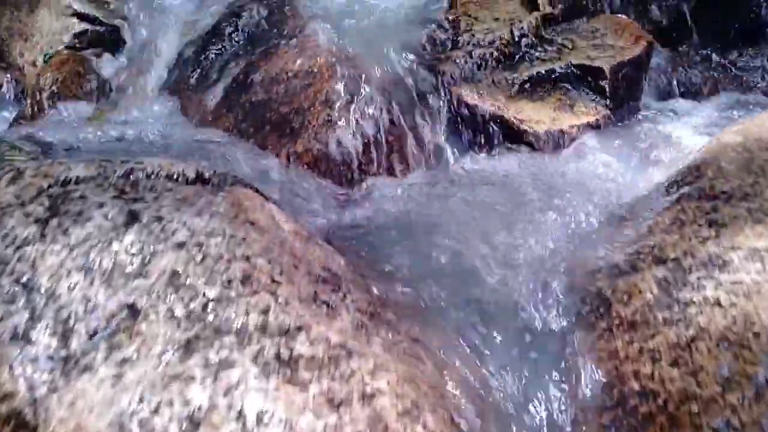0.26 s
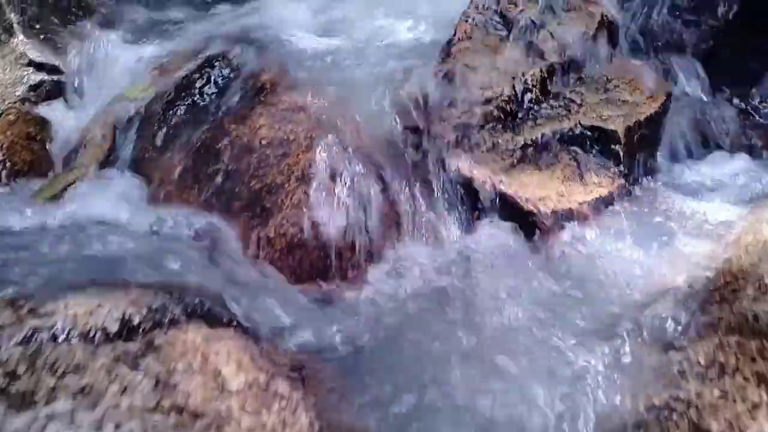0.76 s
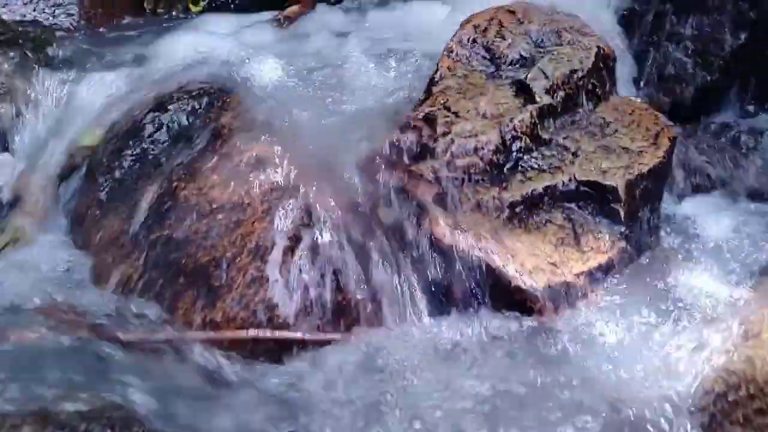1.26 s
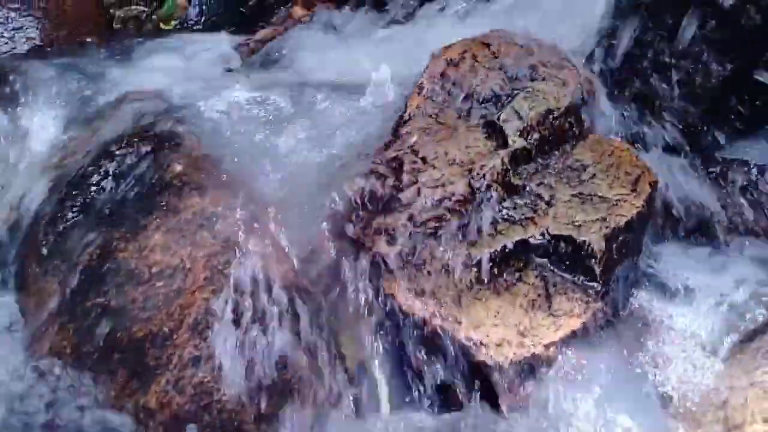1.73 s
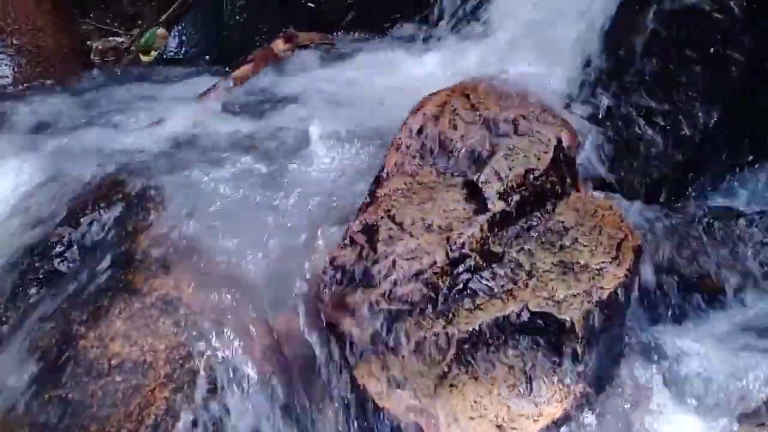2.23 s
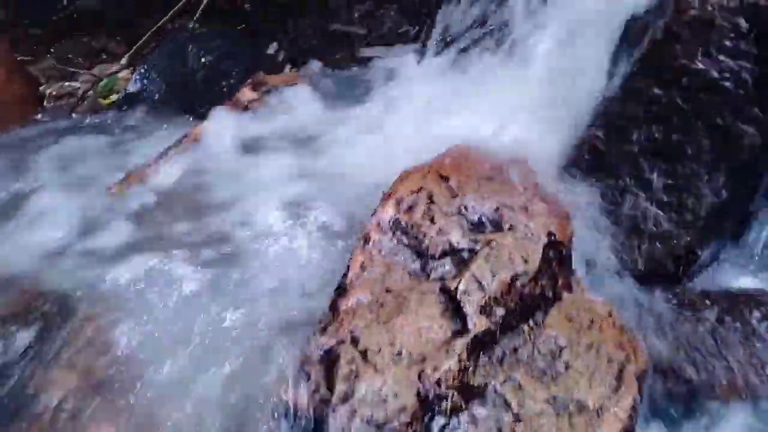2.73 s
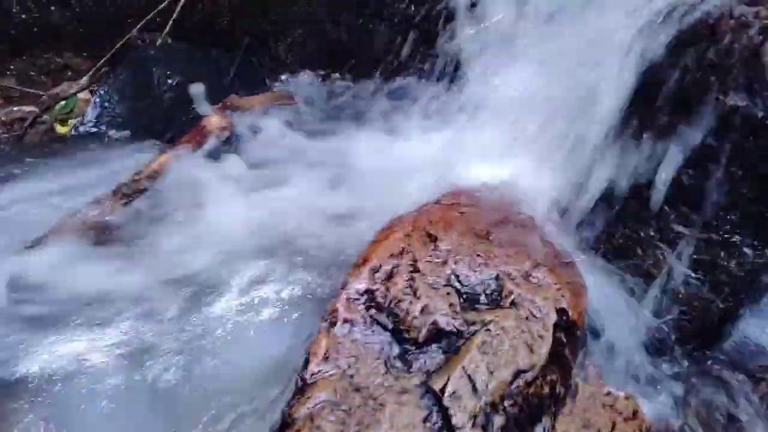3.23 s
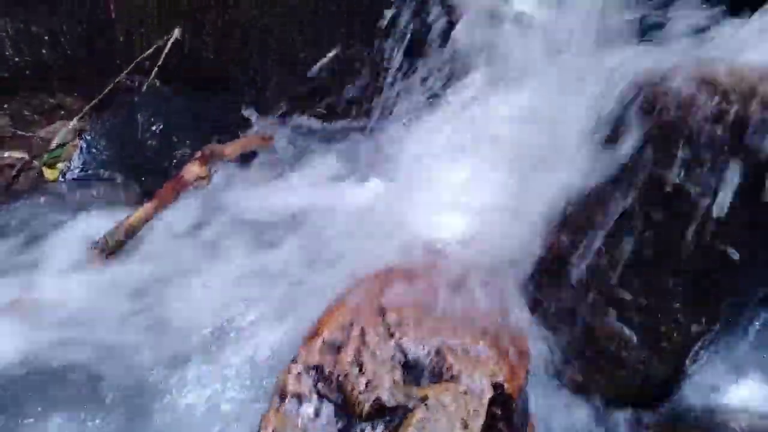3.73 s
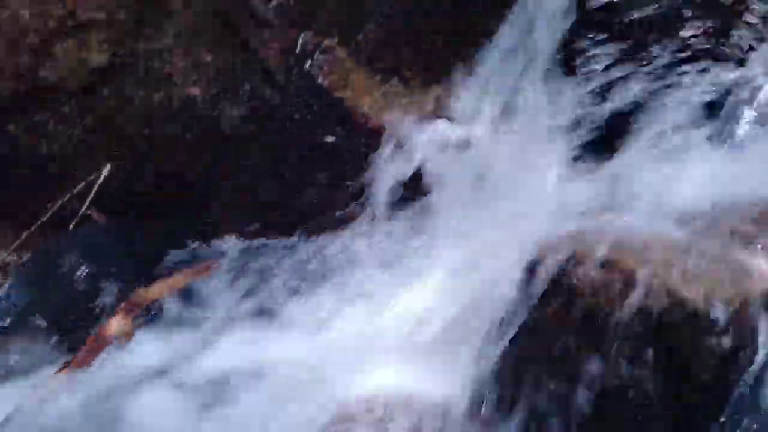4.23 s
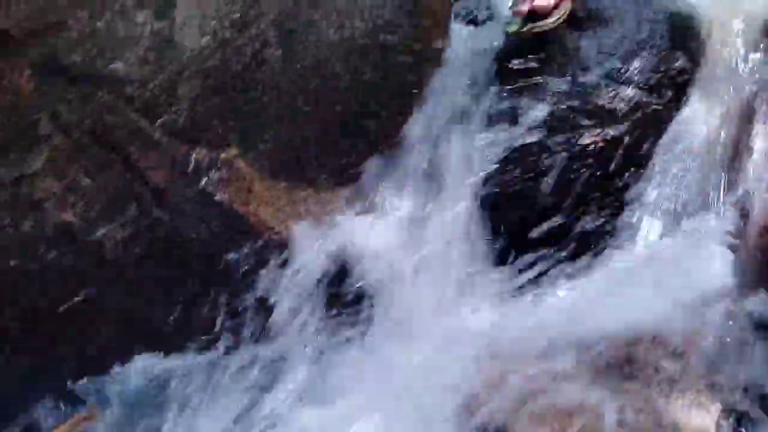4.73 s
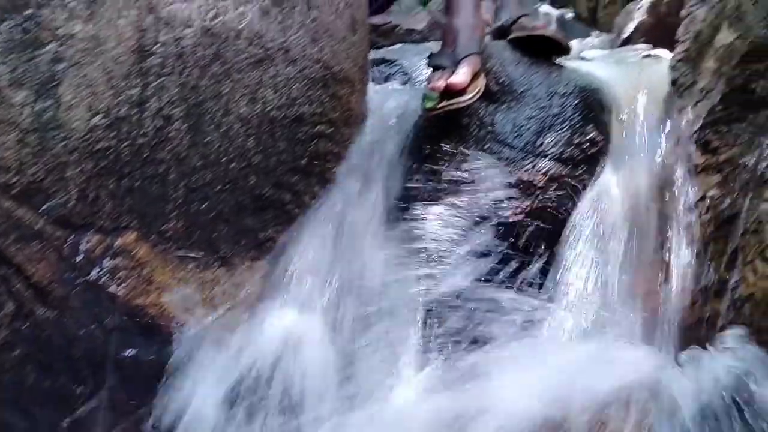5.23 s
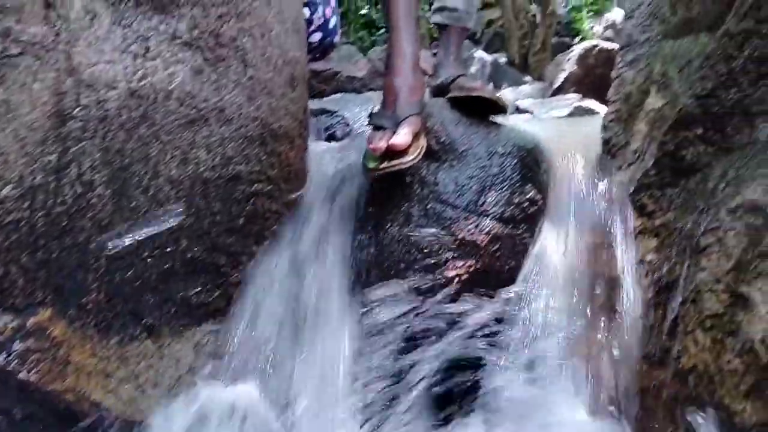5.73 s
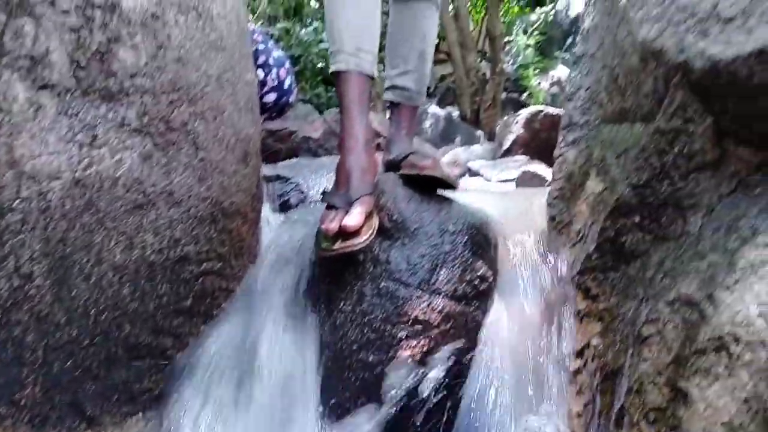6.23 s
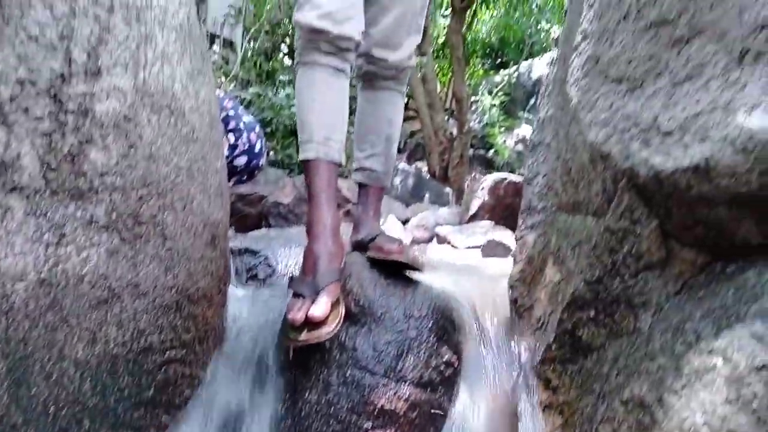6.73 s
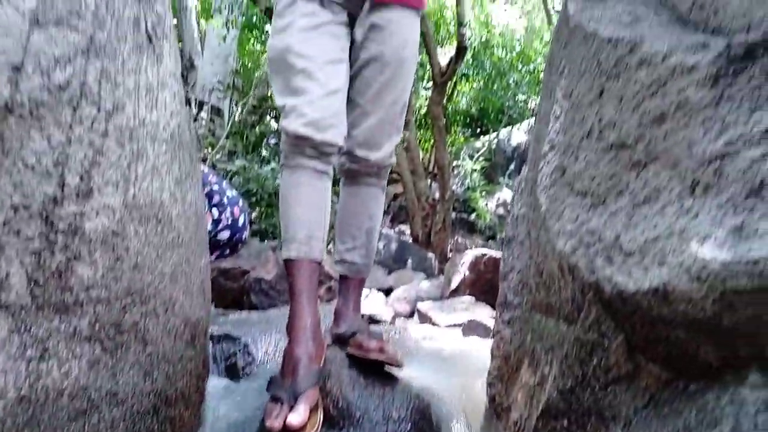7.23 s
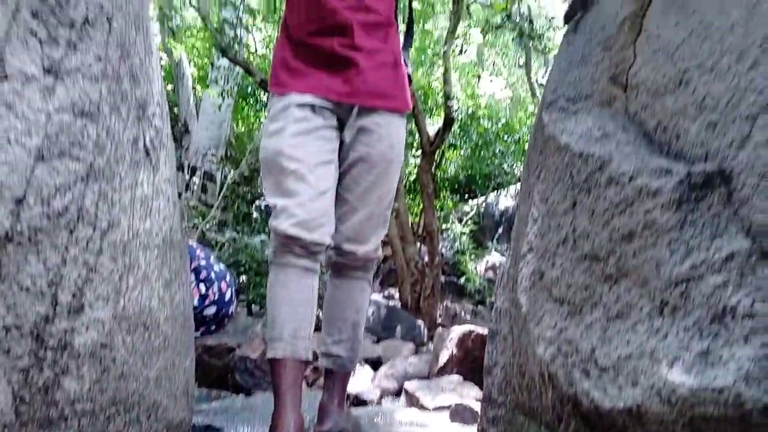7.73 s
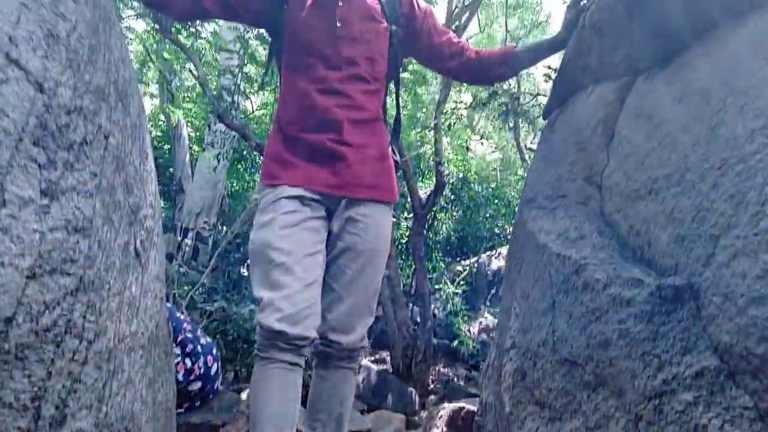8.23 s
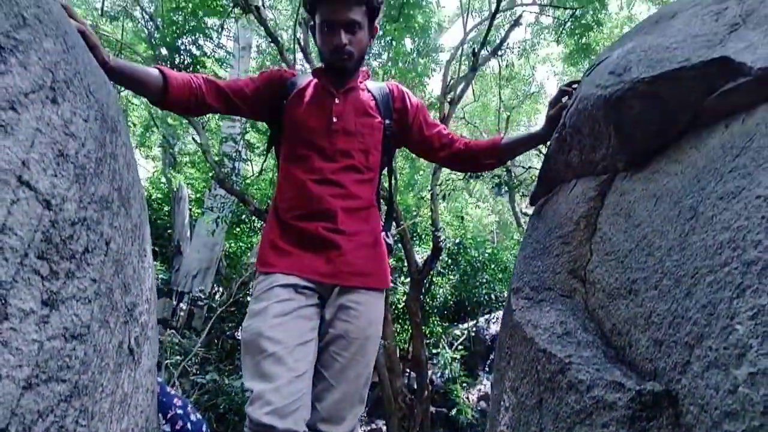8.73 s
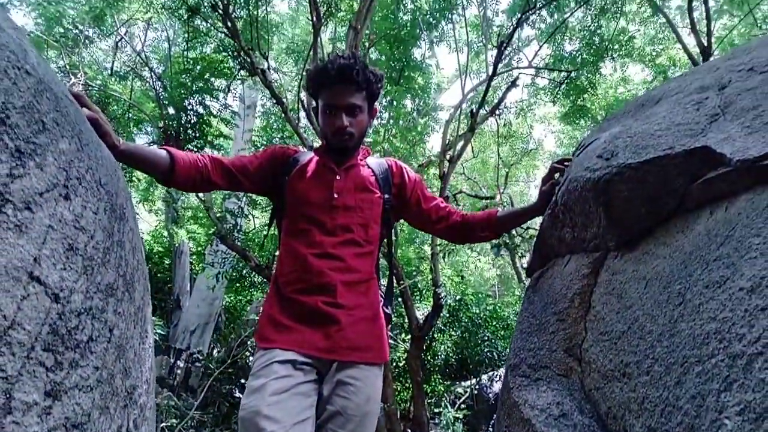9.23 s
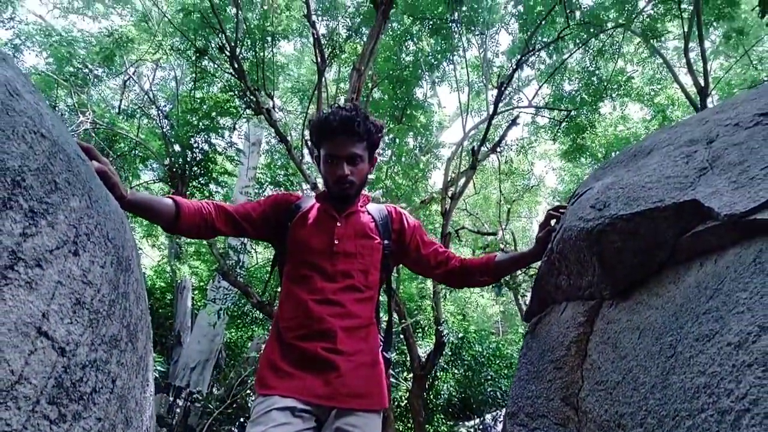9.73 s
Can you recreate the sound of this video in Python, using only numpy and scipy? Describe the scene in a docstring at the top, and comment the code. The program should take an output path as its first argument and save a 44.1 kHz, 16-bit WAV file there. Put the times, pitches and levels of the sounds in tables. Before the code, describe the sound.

A small stream cascades between boulders, heard close through a dull microphone with little treble and little deep bass. From 0 s a steady but patchy low-mid rush flickers and surges, filled with dense tiny ringing bubbles and a thin, faint spray hiss. Over it come many short irregular plops and glugs, each a rounded tone climbing slightly in pitch inside a ragged splash. A strong plop jumps out near 1.3 s, a cluster of gulps around 1.9 s, another heavy splash at 3.8 s, and after a busy steady stretch deeper, louder gulps at about 6.5 to 6.9 s. At roughly 7.7 s one loud, hollow, very short knock overloads with a hard click. Immediately afterwards the water falls to a much lower level, with softer, sparser plops and subdued bubbling, rising slightly around 9 s and continuing to the end near 10 s.

```python
"""Between boulders, close to a dull microphone, a small stream tumbles.
Many plops sound as short tones of climbing pitch, each in a ragged wash of filtered noise.
Around them lie a patchy rush of noise bands, a carpet of small ringing bubbles and a fine hiss of spray.
One loud hollow knock overloads the recorder with a click; the recorded level drops after it and stays lower."""
import sys
import numpy as np
from scipy import signal
from scipy.io import wavfile
from scipy.ndimage import uniform_filter1d, minimum_filter1d

SR = 44100
rng = np.random.default_rng(int(sys.argv[2]) if len(sys.argv) > 2 else 0)


def store_wav(level_fs):
    """Save 16-bit WAV to argv[1]."""
    pcm = np.round(np.clip(np.atleast_2d(level_fs), -1, 1) * 32767)
    wavfile.write(sys.argv[1], SR, pcm.T.astype(np.int16))


N = 439236   # samples, just under 10 s

# Single plops and high droplets, with some extra tones around the knock; levels stand ahead of the limiter.
# Each row: centre in seconds, pitch in Hz, peak in dB, length at half height in ms.
SINGLE_PLOPS = [(0.008, 896, -13, 13), (0.086, 1533, -16.5, 11.6), (0.099, 512, -14, 7.9),
                (0.117, 2395, -33, 5), (0.224, 916, -23.5, 23), (0.353, 1190, -20, 21),
                (0.497, 1360, -23, 7.7), (0.589, 915, -13.5, 17), (0.596, 506, -18.5, 14.5),
                (0.703, 1220, -22, 11), (0.799, 428, -15, 7.2), (0.85, 964, -17.5, 11),
                (0.921, 890, -14.5, 7.4), (0.966, 845, -20, 8.3), (0.971, 1410, -17, 10),
                (1.028, 1255, -19.5, 11), (1.176, 316, -20, 34), (1.263, 606, 3, 5.2),
                (1.314, 1954, -29, 8.4), (1.32, 657, -14.5, 9.5), (1.363, 814, -13.5, 6.1),
                (1.459, 329, -6, 4.2), (1.46, 1464, -20.5, 11), (1.468, 807, -19, 31),
                (1.529, 506, -19, 18), (1.681, 870, -20, 10), (1.831, 2990, -32.5, 15),
                (1.876, 380, -10, 4.4), (1.88, 1290, -17.5, 5.4), (1.899, 1150, -17.5, 10),
                (1.945, 230, -17, 19), (1.948, 662, -5, 12), (1.953, 764, -8.5, 11.5),
                (2.044, 980, -17, 12), (2.089, 329, -17.5, 6.6), (2.183, 436, -17, 5.1),
                (2.214, 273, -16.5, 14), (2.221, 807, -11, 18), (2.546, 810, -20.5, 14),
                (2.613, 495, -19, 33), (2.843, 642, -14, 6.5), (2.854, 985, -21, 17),
                (3.195, 920, -14, 4.6), (3.236, 818, -16.5, 27), (3.349, 930, -15, 6.1),
                (3.502, 162, -25, 12), (3.503, 452, -9, 6.4), (3.51, 296, -19.5, 7.9),
                (3.547, 1015, -13, 3.7), (3.631, 408, -16, 12), (3.79, 922, -14.5, 12),
                (3.797, 402, -1, 6.8), (3.805, 1370, -11.5, 7.8), (3.818, 760, -10.5, 7.9),
                (3.856, 524, -17.5, 17), (3.934, 357, -9.5, 3.9), (3.941, 233, -19, 22),
                (4.026, 588, -11, 12), (4.04, 515, -11.5, 10), (4.058, 710, -19, 12),
                (4.257, 3177, -36.5, 8), (4.288, 875, -21.5, 8), (4.468, 150, -29, 10),
                (4.494, 292, -22, 9.2), (4.621, 906, -12.5, 16.4), (4.848, 879, -7.5, 12.3),
                (4.927, 816, -21, 12), (4.956, 480, -21.5, 13), (5.092, 342, -9.5, 9.6),
                (5.125, 2770, -34, 14), (5.227, 475, -17.5, 17), (5.307, 1010, -19, 24),
                (5.368, 706, -16.5, 8.3), (5.418, 895, -14, 13), (5.438, 390, -17.5, 19),
                (5.562, 960, -14, 19), (5.625, 2400, -32, 3.6), (5.718, 1290, -14.5, 5.5),
                (5.752, 910, -17.5, 11), (5.882, 513, -19.5, 9.7), (5.91, 580, -17, 10),
                (6.178, 1096, -22, 14), (6.193, 420, -19.5, 7.9), (6.209, 758, -18, 14),
                (6.245, 254, -13.5, 13), (6.281, 490, -18, 16), (6.454, 994, -9.5, 4.6),
                (6.484, 560, -4, 5), (6.491, 404, -12.5, 19), (6.615, 408, -13, 8),
                (6.687, 309, -4.5, 12.6), (6.693, 548, -3.5, 9.4), (6.696, 130, -20.5, 10.4),
                (6.781, 650, -10, 13), (6.805, 1490, -18, 6), (6.82, 824, -6.5, 14),
                (6.861, 1840, -24.5, 6.5), (6.874, 155, -26, 23), (6.876, 324, -11.5, 6.4),
                (6.912, 514, -14.5, 4.8), (6.918, 227, -16, 4.6), (7.076, 584, -12.5, 11),
                (7.253, 286, -22.5, 17), (7.3, 420, -20, 14), (7.435, 490, -11, 29), (7.659, 596, -17, 3.2),
                (7.662, 310, -19, 8.5), (7.666, 760, -11.5, 4.4), (7.668, 2806, -36, 17),
                (7.687, 980, -19, 7), (7.78, 397, -19.5, 8.1), (7.82, 417, -22, 11),
                (7.935, 532, -27.5, 11.4), (8.069, 487, -24, 9.9), (8.089, 1330, -17.5, 3.1),
                (8.1, 1264, -12, 6.4), (8.277, 1326, -27.5, 13), (8.388, 748, -24, 23),
                (8.448, 297, -31.5, 25), (8.496, 622, -22.5, 11.4), (8.677, 608, -19.5, 10),
                (8.76, 380, -20.5, 18), (8.842, 1170, -25, 6.5), (8.881, 970, -22, 10),
                (8.889, 573, -25, 9.1), (9.08, 440, -24.5, 14.5), (9.326, 890, -24, 12),
                (9.388, 273, -27, 22), (9.481, 1054, -16, 16.3), (9.579, 970, -20.5, 10),
                (9.58, 324, -16, 5.8), (9.778, 484, -21, 15)]
# The smaller plops: how far they peak above the rush reference, by pitch.
# Each row: pitch in Hz, peak above the reference in dB.
SMALL_PLOP_PEAKS = [(180, -3.5), (400, 3.5), (900, 4), (1400, -0.1), (2000, -12), (3300, -13)]
# The one hollow knock, flat at the top for two thirds of its length.
# The row: centre in seconds, pitch in Hz, peak in dB, length in ms.
KNOCK_EVENT = (7.6706, 1046, -3.5, 8.5)
# Level of rush and spray as recorded, trimmed in scene(); the drop after the knock is included.
# Each row: time in seconds, rush reference in dB, spray hiss reference in dB.
RECORDED_LEVELS = [(0.0, -24.5, -49), (0.4, -26.5, -51.5), (1.0, -25.5, -48), (1.7, -24, -49),
                   (2.2, -23.5, -48.5), (3.3, -26.5, -52.5), (3.85, -22, -49.5), (4.1, -25, -51),
                   (4.75, -25.5, -50), (5.3, -25.5, -48), (6.2, -26, -51), (6.85, -22, -46),
                   (7.62, -26.5, -50), (7.71, -34.5, -61.5), (8.5, -35, -58), (9.0, -31.5, -56.5),
                   (9.3, -33.5, -59.5), (9.96, -32.5, -54.5)]
# The colour of the rush. Each row: frequency in Hz, relative level in dB per Hz.
RUSH_SPECTRUM = [(15, -53.5), (25, -34.5), (42, -18), (114, -17), (238, -5.5), (374, -6), (478, -0.5),
                 (928, 1.5), (1460, -5), (1940, -34), (2300, -25), (2990, -56.5), (5060, -120)]
# The mix of small bubble sizes. Each row: ringing pitch in Hz, relative level in dB.
BUBBLE_SIZES = [(120, -32.5), (250, -4.5), (500, 2.5), (1000, 6.5), (1500, -1), (2200, -30.5)]

SMALL_COUNT, SMALL_SPREAD_DB = 85, 2   # number of small plops; level scatter, plus or minus
SMALL_SHORT_MS, SMALL_LONG_MS = 4.5, 19.0
LOW_CUT_HZ, LIMIT_TOP = 56, .66        # LIMIT_TOP and OVERLOAD are amplitudes, full scale = 1
MIC_EDGE_HZ, OVERLOAD = 3181, .7
FAINT_HISS_DB, CUTOFF_HZ = -86.5, 15800


def plops(rows, rise_hz, lean, deep_hz, wash_db, wash_length, wash_width):
    """Each plop swells, rings and fades while its pitch climbs, inside a longer ragged wash of nearby pitch.
    Returns the sound, its outline and the outline of the deep ones."""
    sound, outline, deep = np.zeros((3, N))
    white = rng.standard_normal(N)
    start_turns = rng.random(len(rows))   # starting phase, in turns
    for (centre_s, hz, peak_db, ms), turn in zip(rows, start_turns):
        half_s = max(ms, 1) / 2000
        first = max(int((centre_s - 8 * half_s) * SR), 0)
        last = min(int((centre_s + 12 * half_s) * SR), N)
        at = np.arange(first, last)
        u = (at / SR - centre_s) / half_s   # time in half-lengths from the centre

        # the swell is steeper than the fade
        fall_db = 6 * u ** 2 * np.where(u < 0, lean, 1 / lean)
        shape = from_db(peak_db - fall_db)
        climb = rise_hz * np.sqrt(hz / 1000) * u ** 2   # higher plops climb more
        turns = half_s * (hz * u + climb) + turn
        sound[at] += shape * np.sin(2 * np.pi * turns)

        # the air pocket breaks into smaller bubbles
        wash = rms_one(resonance(white[at], hz, wash_width * hz))
        sound[at] += from_db(peak_db + wash_db - fall_db / wash_length ** 2) * wash

        outline[at] += shape
        deep[at] += shape / (1 + (hz / deep_hz) ** 4)
    return sound, outline, deep


def small_plops(rush_db):
    """Rows like those of the single plops, at random moments and pitches; their levels follow the rush."""
    when, size, strength, length = rng.random((SMALL_COUNT, 4)).T
    low_hz, high_hz = SMALL_PLOP_PEAKS[0][0], SMALL_PLOP_PEAKS[-1][0]
    hz = low_hz * (high_hz / low_hz) ** size
    scatter_db = SMALL_SPREAD_DB * (2 * strength - 1)
    peak_db = rush_db[(when * N).astype(int)] + at_hz(SMALL_PLOP_PEAKS, hz) + scatter_db
    ms = SMALL_SHORT_MS * (SMALL_LONG_MS / SMALL_SHORT_MS) ** length
    return list(zip(when * N / SR, hz, peak_db, ms))


def knock(edge_ms):
    """A ring that holds for a few cycles, starts fast and dies more slowly; 6 dB per edge time."""
    centre_s, hz, peak_db, ms = KNOCK_EVENT
    t_ms = (np.arange(N) / SR - centre_s) * 1000
    outside_ms = np.maximum(np.abs(t_ms) - ms / 3, 0)   # time beyond the flat top
    beyond = outside_ms / np.where(t_ms < 0, edge_ms[0], edge_ms[1])
    shape = from_db(peak_db - 6 * np.minimum(beyond, 30))
    return shape * np.sin(2 * np.pi * hz * t_ms / 1000)


def rush(surge_db, own_db, splash, thump, thump_hz):
    """Third-octave bands of noise that surge together and also flicker each on its own; rms 1 between plops."""
    calm, out = 0, 0
    edges = 22 * 2 ** (np.arange(23) / 3)   # Hz
    white = rng.standard_normal((2, N))     # neighbouring bands get unrelated noise
    for k, (low, high) in enumerate(zip(edges, edges[1:])):
        hz = np.sqrt(low * high)
        level_db = at_hz(RUSH_SPECTRUM, hz) + surge_db + own_db * drift(12)
        noise = from_db(level_db) * band(white[k % 2], low, high)
        calm = calm + noise
        bass_swell = thump / (1 + (hz / thump_hz) ** 2)   # thumps swell mainly the bass
        out = out + noise * (1 + splash + bass_swell)
    return out / np.sqrt(np.mean(calm ** 2))


def foam(per_s, surge_db, cycles, spread_db):
    """Small bubbles come at random; a resonance applied twice makes each swell and fade; rms 1."""
    strength_db = spread_db * np.minimum(rng.exponential(1, N), 3.5)
    kicks = from_db(strength_db) * rng.choice([-1, 1], N)
    born = rng.random(N) < per_s * from_db(surge_db) / SR
    dealt = rng.integers(0, 30, N)   # which of 30 pitches a bubble gets
    out = 0
    for k, hz in enumerate(np.geomspace(130, 2200, 30)):
        r = from_db(-60 * hz / (cycles * SR))   # each resonance loses 60 dB in this many cycles
        w = 2 * np.pi * hz / SR
        once = [np.sin(w), 0, 0, 1, -2 * r * np.cos(w), r * r]
        ringing = signal.sosfilt([once, once], kicks * born * (dealt == k) + 1e-18)
        # the last two factors even out the ringing strength across pitches
        out = out + from_db(at_hz(BUBBLE_SIZES, hz)) * ringing * (1 - r) * np.sqrt(hz)
    return rms_one(out)


def spray(surge_db, own_db):
    """Fine droplets hiss in the top of the microphone's range, as three flickering noise bands; rms 1."""
    bands = [(2100, 2500, -11.0), (2420, 3250, 3.5), (3070, 3800, 2.0)]   # (Hz, Hz, relative dB)
    hiss = 0
    for low, high, level_db in bands:
        flicker = from_db(level_db + surge_db + own_db * drift(19))
        hiss = hiss + flicker * band(rng.standard_normal(N), low, high)
    return rms_one(hiss)


def limit(x):
    """Fast limiter on the water: a smooth gain holds its peaks near or under the top."""
    held = -minimum_filter1d(-np.abs(x), size=265)                # peak level over 6 ms
    drive = uniform_filter1d(held, size=177) / LIMIT_TOP + 1e-9   # smoothed over 4 ms
    return x * np.tanh(drive) / drive


def drift(rate_hz):
    """Slow chance: noise at every 40th sample through a double one-pole low-pass; spread 1."""
    r = np.exp(-80 * np.pi * rate_hz / SR)
    white = rng.standard_normal(N // 40 + 2002)
    slow = signal.lfilter([1], [1, -2 * r, r * r], white)[2000:]   # drop the filter's start-up
    return np.interp(np.arange(N) / 40, np.arange(len(slow)), rms_one(slow))


def resonance(x, hz, width_hz):
    """Two-pole resonance applied twice."""
    r = np.exp(-np.pi * width_hz / SR)
    once = [1, 0, -1, 1, -2 * r * np.cos(2 * np.pi * hz / SR), r * r]
    return signal.sosfilt([once, once], x)


def band(x, low_hz, high_hz):
    """Butterworth band-pass."""
    return signal.sosfilt(signal.butter(2, [low_hz, high_hz], "band", fs=SR, output="sos"), x)


def in_time(rows):
    """Curve columns at every sample."""
    s, *columns = np.transpose(rows)
    return [np.interp(np.arange(N) / SR, s, c) for c in columns]


def at_hz(points, hz):
    """Curve value on a log-frequency axis."""
    point_hz, value = np.array(points).T
    return np.interp(np.log(hz), np.log(point_hz), value)


def from_db(db):
    """Decibels to gain."""
    return 10 ** (np.asarray(db) / 20)


def rms_one(x):
    """Scale to rms 1."""
    return x / np.sqrt(np.mean(x ** 2) + 1e-20)


def scene():
    """Rush, foam and spray share their surges; every plop throws up a splash, a deep one also thumps."""
    rush_db, spray_db = in_time(RECORDED_LEVELS)
    surge = .8 * drift(9) + .6 * drift(1.7)

    plop_sound, outline, deep = plops(SINGLE_PLOPS + small_plops(rush_db), rise_hz=12.0, lean=1.23,
                                      deep_hz=380, wash_db=-10.0, wash_length=2.22, wash_width=0.28)
    # how far a plop stands out of the rush, over 15 ms
    splash = uniform_filter1d(outline, size=661) / from_db(rush_db)
    # the displaced water moves more slowly, over 30 ms
    thump = uniform_filter1d(deep, size=1323) / from_db(rush_db)

    water = from_db(rush_db - 3) * rush(1.1 * surge, own_db=2.5, splash=0.19 * splash,
                                        thump=3.3 * thump, thump_hz=140)
    bubbles = from_db(rush_db - 4) * foam(250, 2.5 * surge, cycles=37.3, spread_db=4.0)
    droplets = spray(.5 * surge + 2.2 * drift(13), own_db=3.5)
    hiss = from_db(spray_db + 2.23) * (1 + 0.048 * splash) * droplets

    stream = plop_sound + water + bubbles + hiss
    low_cut = signal.butter(2, LOW_CUT_HZ, "high", fs=SR, output="sos")
    thin = signal.sosfilt(low_cut, stream)   # little deep bass arrives
    return (limit(thin) + knock(edge_ms=(1.5, 3.2)))[None]


def record(dry):
    """The microphone loses the treble; overloads clip hard over a very faint steady white hiss; the top is cut."""
    dull = signal.sosfilt(signal.butter(14, MIC_EDGE_HZ, fs=SR, output="sos"), dry)
    clipped = np.clip(dull, -OVERLOAD, OVERLOAD)
    faint_hiss = from_db(FAINT_HISS_DB) * rng.standard_normal(dry.shape)
    top_cut = signal.cheby2(20, 60, CUTOFF_HZ, fs=SR, output="sos")
    return signal.sosfilt(top_cut, clipped + faint_hiss)


dry = scene()
out = record(dry)
store_wav(out)
```